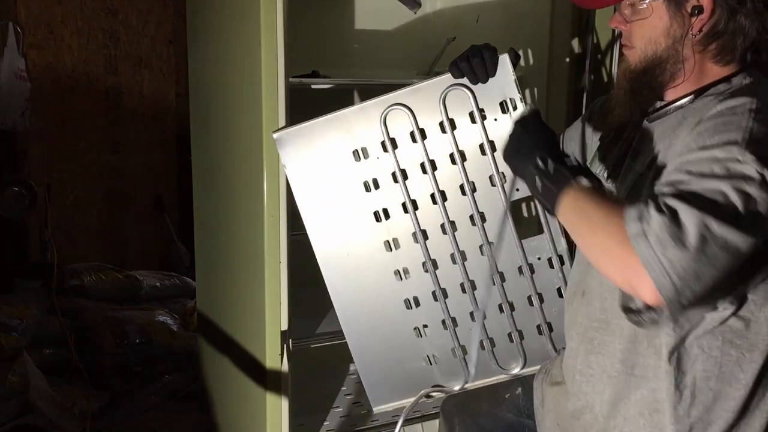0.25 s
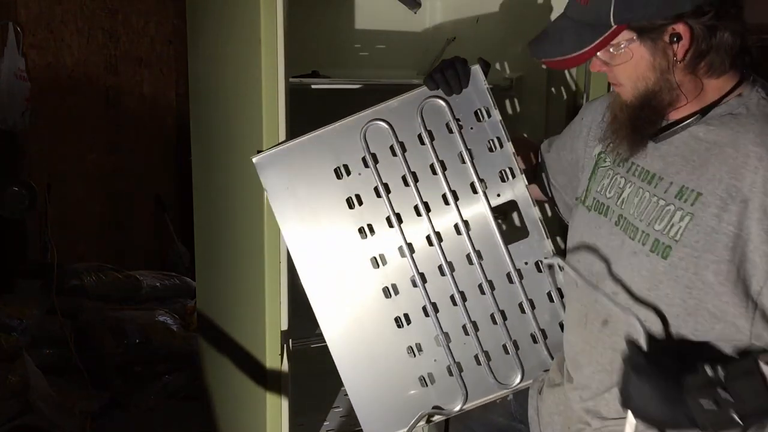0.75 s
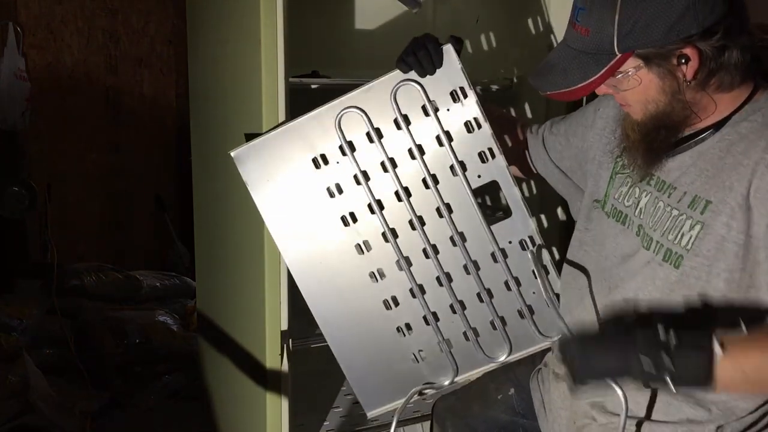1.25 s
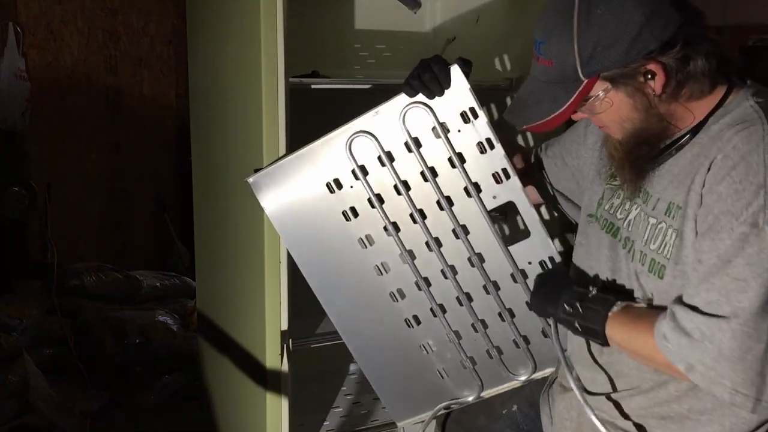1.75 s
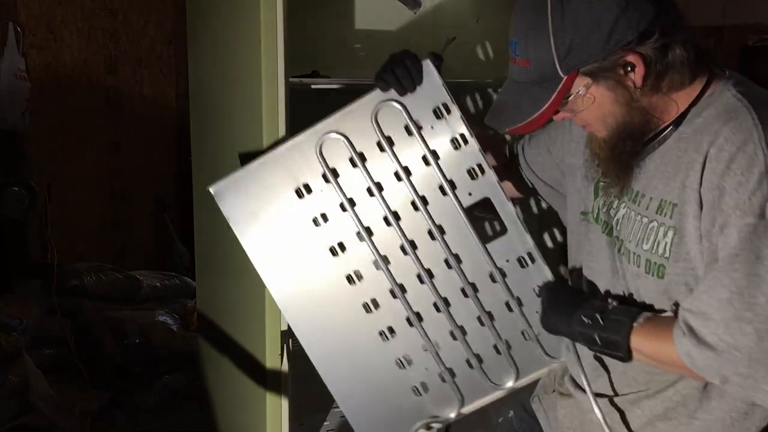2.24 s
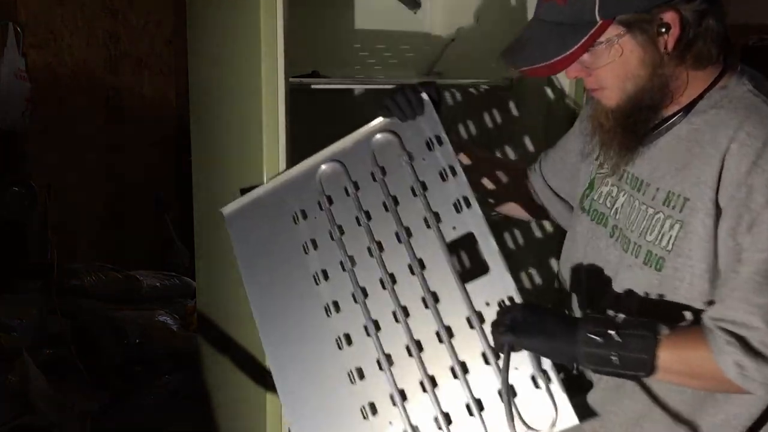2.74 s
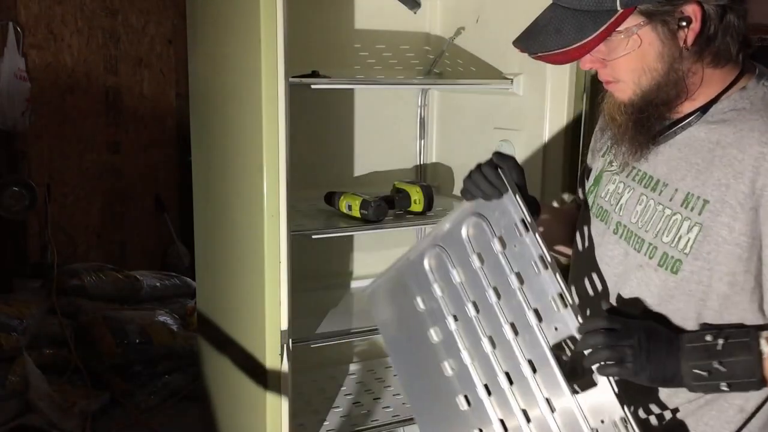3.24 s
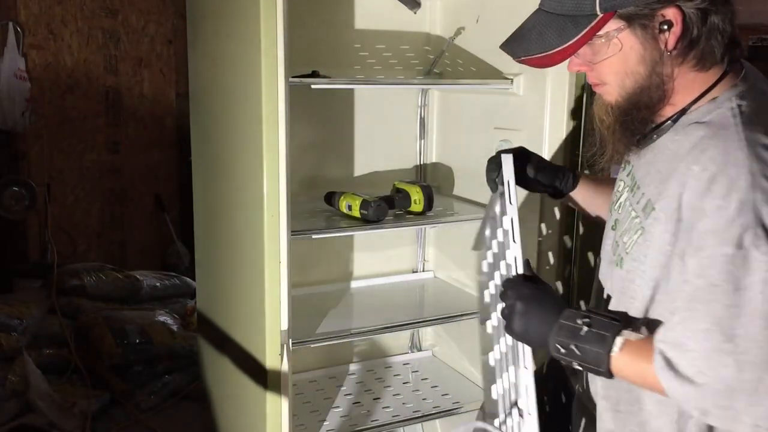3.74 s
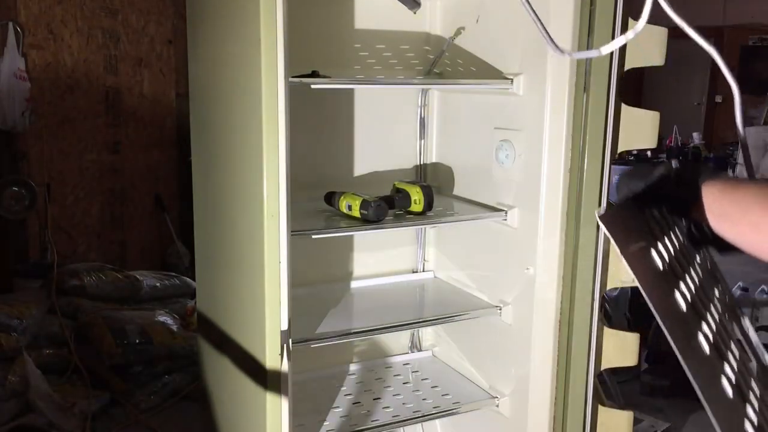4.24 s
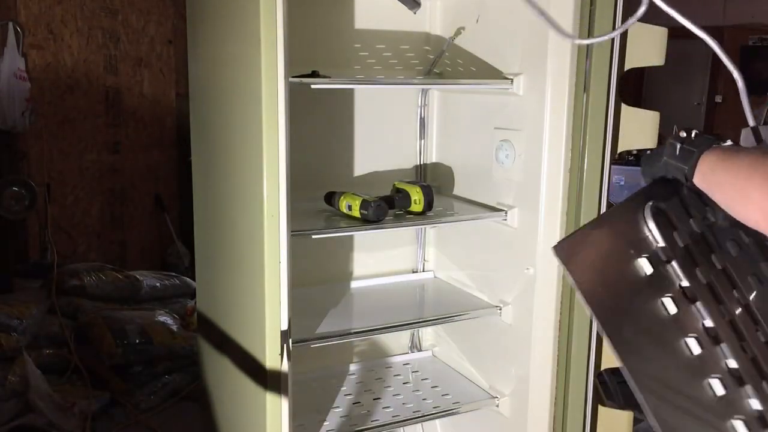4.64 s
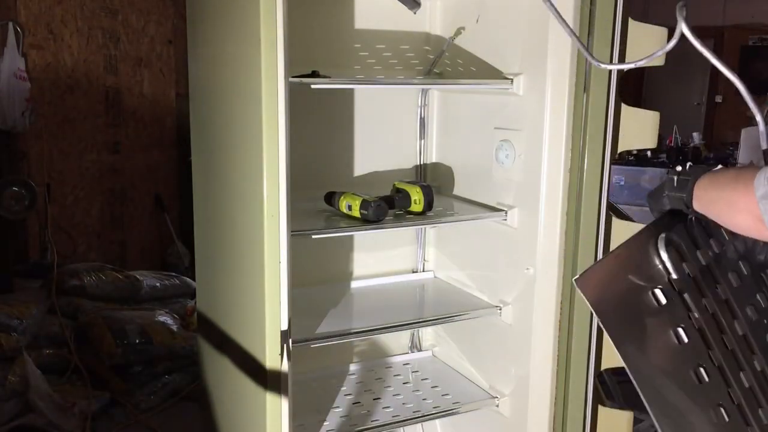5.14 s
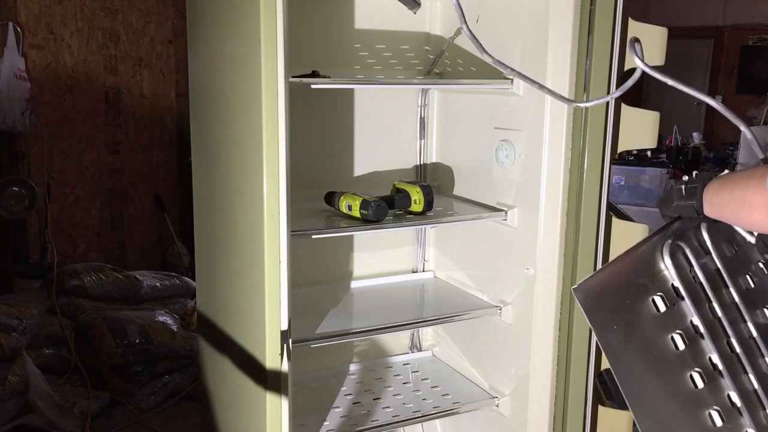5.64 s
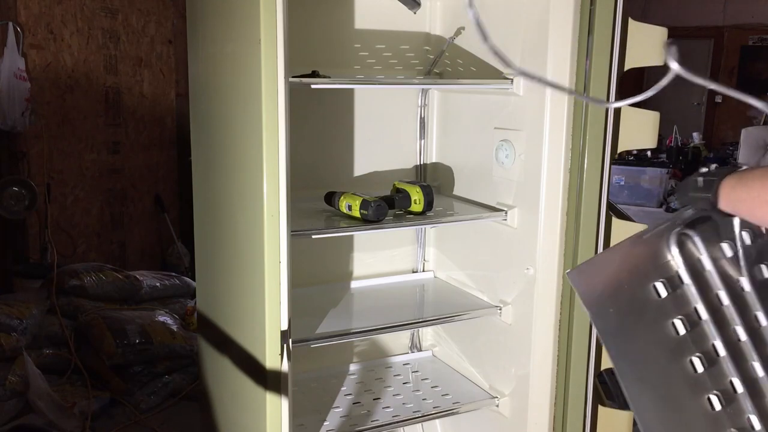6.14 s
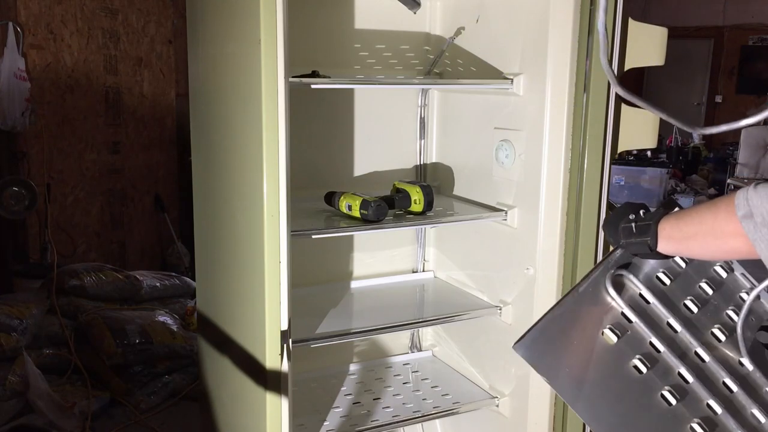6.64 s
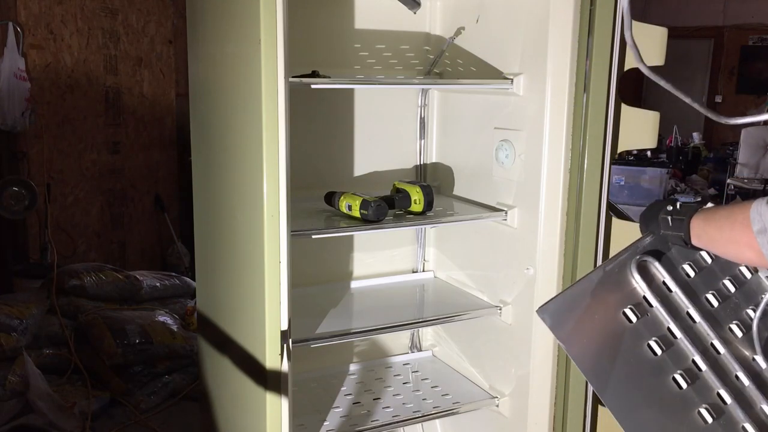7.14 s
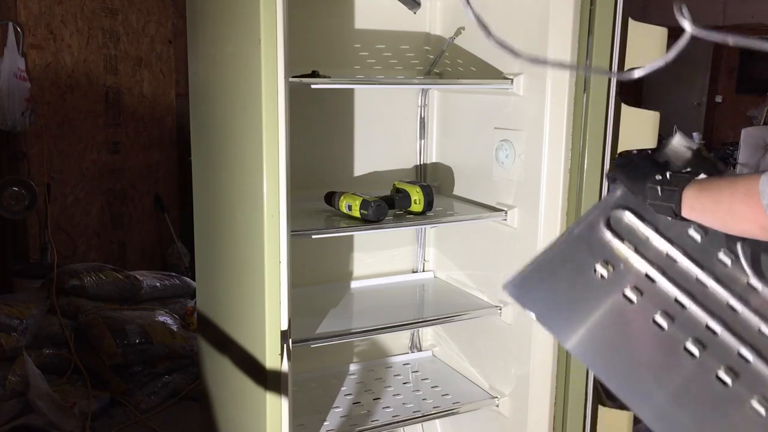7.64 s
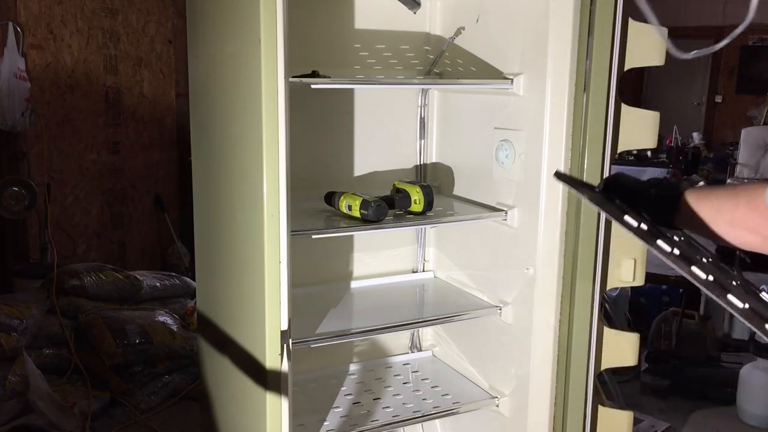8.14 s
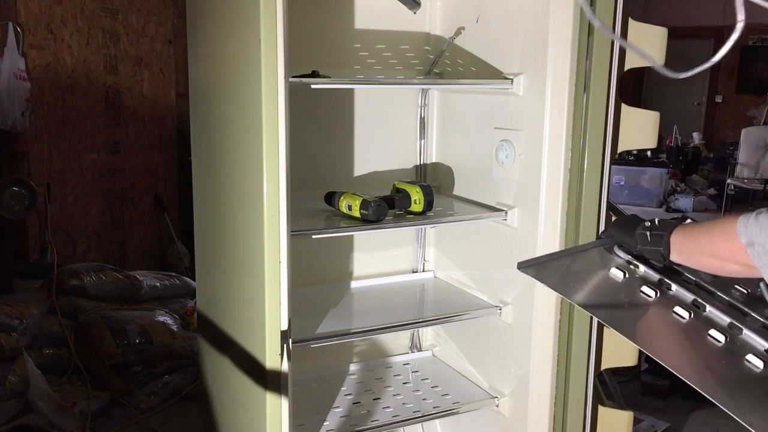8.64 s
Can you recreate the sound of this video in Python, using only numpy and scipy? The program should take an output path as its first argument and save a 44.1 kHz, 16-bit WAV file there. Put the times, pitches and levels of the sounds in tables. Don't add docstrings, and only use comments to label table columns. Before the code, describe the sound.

In a quiet workshop, gloved hands pull a thin metal tube from a perforated plate close to a small microphone. Clips snap in a quick cluster, then singly, ending in two loud, ringing releases. Gloves hiss and scrape afterwards, with a few creaks and looser clatters, over low room hum and a far-off wavering whir.

```python
import sys
import numpy as np
from scipy import signal
from scipy.fft import rfft, irfft
from scipy.io import wavfile

SR = 44100
rng = np.random.default_rng(int(sys.argv[2]) if len(sys.argv) > 2 else 0)


def dump(signal):
    limited = np.clip(np.atleast_2d(signal).T, -1, 1)
    pcm = np.round(limited * 32767).astype(np.int16)
    wavfile.write(sys.argv[1], SR, pcm)


def magnitude_from_level(level_db):
    exponent = np.asarray(level_db, float) / 20
    return 10 ** exponent


N = 391608

# pitch_hz, level_db per Hz
HUM_COLOUR = [(24, -48.5), (40, -14), (140, 6), (312, -3.5), (467, -2), (873, -14), (1040, -7),
              (2380, -14.5), (4930, -14.5), (12800, -19.5), (16000, -21.5)]
# time_s, level_db
WHIR_LEVEL = [(0.0, -71), (0.25, -81), (0.44, -53), (0.96, -68.5), (1.56, -89), (2.15, -65), (2.57, -86),
              (2.94, -80), (3.29, -86), (3.912, -82), (3.925, -66), (6.16, -64), (6.5, -60.5), (6.7, -64.5),
              (7.84, -66.5), (8.56, -70), (8.88, -77)]
# pitch_hz, level_db per Hz
WHIR_COLOUR = [(300, -39), (500, -7.5), (900, -3.5), (1450, -10), (1600, -12.5), (2500, -39.5)]
# time_s, pitch_hz
WHIR_PITCH = [(0, 994), (4.4, 1022), (5.0, 970), (5.4, 887), (5.9, 806), (6.15, 982), (7.5, 955),
              (8.88, 984)]

# pitch_hz, level_db per Hz
HISS_COLOUR = [(1060, -41.5), (1800, 10), (2060, 5), (2410, 5.5), (4700, 9.5), (14900, 4), (16000, -15)]
# pitch_hz, level_db per Hz
SCRAPE_COLOUR = [(200, -30), (400, -3.5), (700, -5), (1300, -5.5), (2200, -6), (3500, -16), (7000, -33)]
# start_s, hold_s, hiss_db, scrape_db
STROKES = [(0.014, .02, -71, -69), (0.115, 0.016, -68.5, -76), (1.223, 0.12, -62, -65),
           (1.247, 0.035, -72, -56.5), (1.404, 0.027, -62.5, -67.5), (1.504, 0.047, -64, -64.5),
           (1.666, .03, -67.5, -63.5), (1.836, 0.25, -68, -66.5), (2.19, 0.11, -70, -67),
           (2.324, 0.12, -63, -61), (2.509, 0.19, -68.5, -65), (3.479, 0.044, -67.5, -70.5),
           (3.553, 0.073, -88, -67), (3.633, 0.0088, -73, -76), (3.699, 0.021, -69.5, -76),
           (3.82, 0.031, -69, -82),
           (3.94, 0.025, -63.5, -67), (4.05, 0.026, -69, -75.5), (4.125, 0.013, -70, -71),
               (4.202, 0.015, -52, -58), (4.25, 0.055, -66.5, -65), (4.54, 0.15, -60.5, -68),
               (4.70, 0.098, -58, -70.5), (4.909, 0.065, -64.5, -65), (5.105, .02, -69, -69.5),
               (6.17, 0.077, -77, -75), (6.945, 0.01, -64, -72), (6.954, 0.066, -56, -62),
               (7.094, 0.029, -60, -63.5), (7.197, 0.012, -68, -74.5), (7.39, 0.026, -67.5, -84),
               (7.42, 0.027, -63.5, -76.5), (7.5, 0.032, -57, -71), (7.57, 0.078, -57, -59.5),
               (7.66, 0.061, -59, -55), (7.80, 0.063, -53, -65.5), (7.94, 0.067, -64.5, -65),
               (8.07, 0.048, -57.5, -74), (8.409, 0.01, -58, -70), (8.55, .01, -66, -69.5),
               (8.6, 0.011, -61.5, -73), (8.70, 0.095, -80, -63.5)]
# release_s, scrape_db, hum_db
CREAKS = [
    (0.264, -51.5, -67),
    (0.877, -52, -56.5),
    (1.25, -56, -59.5),
    (1.983, -56.5, -57),
    (2.33, -74, -71),
    (2.68, -66.5, -76),
    (5.355, -67, -67.5),
    (6.251, -66, -74.5),
    (6.617, -51.5, -68.5),
    (8.122, -58.5, -70),
]
# pitch_hz, width_hz, level_db
CREAK_TONES = [(537, 82, -5.5), (1080, 230, -13), (1690, 160, -9)]

# pitch_hz, t60_s
PLATE_T60 = [(150, 0.07), (600, 0.098), (2000, 0.14), (6000, 0.09), (15000, 0.045)]
# pitch_hz, t60_s
WASH_T60 = [(100, 0.53), (500, 0.44), (1300, .3), (2500, 0.53), (4000, 0.87), (6000, 0.85), (9000, 0.63),
            (15000, 1)]
# pitch_hz, level_db
WASH_COLOUR = [(60, -29), (150, -8), (500, 4), (1300, 1), (2500, -5.5), (4000, -8), (6000, -3.5),
               (9000, -5), (15000, -13)]
WASH_EDGES_HZ = 50 * 2 ** np.arange(0, 8.6, .5)

# start_s, level_db, thud_db, rattle_t60_s, wash_db
SNAPS = [(0.268, -25, -34, 0.076, -18.5), (0.3735, -25.5, -36, 0.051, -17), (0.396, -19.5, -44, 0.048, -45),
         (0.4094, -39, -47, 0.064, -28), (0.5445, -10.5, -36, 0.051, -44.5),
         (1.9884, -31.5, -37, 0.019, -12), (2.0085, -24.5, -57, 0.086, -37), (5.3575, -39, -35, 0.044, -43),
         (6.2584, -18.5, -25.5, 0.057, -26.5), (6.3252, -25, -25, 0.098, -27.5),
         (6.336, -21, -28.5, 0.03, -25), (6.623, -23.5, -26, 0.074, -29), (8.1353, -41.5, -70, 0.17, -29)]
# start_s, level_db, thud_db, rattle_t60_s, wash_db
CRACKS = [(.5006, -19, -32, 0.034, -40), (0.5028, -14.5, -23.5, 0.061, -18.5),
          (0.5356, -16.5, -30.5, 0.04, -38), (.8862, -30.5, -40, 0.044, -28),
          (1.698, -31, -41, 0.13, -20.5), (2.0435, -24.5, -34.5, 0.1, -24), (2.6842, -12, -27, 0.079, -23),
          (2.9684, -16, -33, 0.12, -18.5), (5.3628, -25.5, -31, 0.064, -22),
          (5.3915, -24.5, -54.5, 0.057, -39), (8.1275, -39, -40.5, 0.04, -16),
          (4.2085, -46, -59, 0.11, -28.5)]
# start_s, level_db, thud_db, rattle_t60_s, wash_db
SLIPS = [
    (0.8874, -18.5, -24.5, 0.081, -27),
    (8.8315, -27.5, -33.5, 0.1, -20),
]
# start_s, level_db, thud_db, edge_db
BUMPS = [(0.2915, -49, -42, -65), (.775, -61, -43, -78), (1.2464, -60, -43, -58),
         (2.336, -48, -46.5, -52.5), (3.6415, -53, -54.5, -48.5), (4.135, -49, -60.5, -50.5),
         (5.116, -46, -63.5, -57.5), (5.708, -68.5, -72, -80), (6.5125, -54, -60, -69),
         (7.528, -45, -63.5, -68.5), (8.42, -63, -73, -48.5), (8.7261, -63, -57, -65.5),
         (8.7645, -69, -66, -74)]
# start_s, level_db, thud_db, edge_db
TICKS = [(3.919, -55, -68, -61), (4.4972, -52, -66.5, -55), (4.5622, -53.5, -54, -56),
         (6.957, -49, -66, -58), (7.0186, -55, -64, -49), (7.084, -48, -49.5, -54), (7.6719, -47, -63, -57),
         (7.502, -51.5, -69, -52), (8.5567, -56, -72, -51), (8.602, -50, -58, -50),
         (8.6985, -63, -67.5, -62.5)]
# start_s, level_db
FIRST_BLOWS = [(.2677, -34), (.3734, -38), (.3948, -35), (.5047, -23), (.5116, -24), (.5373, -23),
               (.5408, -23), (.5431, -22), (.8864, -32), (.8883, -32), (.891, -33), (1.7002, -38),
               (1.7046, -38), (2.0128, -35), (2.0473, -30), (2.6836, -14), (2.6866, -15), (2.6883, -16),
               (2.6923, -15), (2.9682, -12.5), (2.9703, -17), (4.2075, -47), (4.4968, -57), (4.562, -49),
               (5.363, -32), (5.3685, -31), (5.391, -29), (5.3928, -31), (6.258, -32), (6.2603, -32),
               (6.3235, -32), (6.331, -33), (6.337, -27), (6.6256, -33), (6.9587, -53), (6.9625, -56),
               (7.0186, -51), (7.024, -54), (7.5015, -51), (7.5279, -52), (7.627, -55), (7.6716, -54),
               (7.8043, -55), (8.1349, -47), (8.4189, -56), (8.5556, -55), (8.6025, -50), (8.8407, -40)]
# pitch_hz, level_db
SNAP_COLOUR = [(40, -59.5), (100, -25.5), (190, -5.5), (500, 0), (1200, -6.5), (3000, -6.5), (6000, 8.5),
               (10000, 2), (16000, -9)]

# pitch_hz, level_db, t60_s
PLATE_UP = [(186.3, -13, 0.27), (555.8, 0.5, 0.12), (544, -10, 0.27), (635, -9.5, 0.23), (1053, -3, 0.057),
            (1116, -17.5, .25)]
# pitch_hz, level_db, t60_s
TAB = [(1772, -4.5, 0.086), (1631, -6.5, 0.13), (2110, -13.5, 0.13)]
TUBE_HZ = 5530
# pitch_hz, level_db, t60_s
TUBE = [(TUBE_HZ, -1.5, 0.056), (TUBE_HZ, -24.5, 0.51)]
# pitch_hz, level_db, t60_s
PLATE_LOW = [(203, -4, 0.32), (343.7, -9, 0.23), (445, -8, 0.17), (555.6, 2, 0.098), (607, -8, 0.22),
             (700, 0.5, 0.065), (866, 0.5, 0.07), (1051, 0, 0.069), (1229, -6, 0.14), (1554, -4, 0.12),
             (1916, -5.5, 0.099)]
# pitch_hz, level_db, t60_s
CORNER = [(230, -17, 0.33), (511, -3, 0.14), (619, -11.5, 0.4), (764, -16.5, 0.3), (1529, -7, 0.13),
          (2230, -9, 0.35), (2051, -13, .42), (1728, -16.5, 0.4), (2390, -6, 0.2), (2729, -12.5, .2),
          (4400, -5.5, 0.06), (4910, -18, 0.44), (5152, -18.5, 0.37), (6590, -13, .17)]
# pitch_hz, level_db, t60_s
EDGE = [(200, -19.5, 0.66), (449.5, -14.5, 0.2), (656, -9.5, 0.35), (787, -4.5, 0.3), (1087, -14.5, 0.18),
        (1250, -12.5, 0.3), (1433, -14.5, 0.33), (1650, -4.5, 0.36), (1740, -6.5, 0.25), (1910, -13.5, 0.3),
        (2256, -19, .3), (3688, -15, .5), (4102, -20, 0.6), (4777, -17, .4)]
# start_s, level_db
CORNER_BLOW = (2.684, -26.5)
# start_s, level_db
EDGE_BLOW = (2.969, -28)
# start_s, plate_db, tuning_ratio, tab_db
RINGING_UP = [(.267, -32.5, 1.026, -25), (0.288, -33.5, 1.08, -58), (.372, -34, 1.01, -28.5),
              (.394, -34.5, 0.96, -50), (.425, -42, .98, -68), (.503, -30, 1.06, -23),
              (.519, -29.5, 1.05, -49.5), (0.538, -29, 1.02, -35), (.888, -30.5, 1.09, -31.5),
              (1.245, -49, 1.01, -73), (1.523, -76, 1.005, -59), (1.701, -42, 1.08, -41),
              (1.99, -36, 1, -50), (2.008, -34.5, 1, -28.5), (2.043, -38.5, 0.99, -55)]
# start_s, level_db, favoured_hz
RINGING_LOW = [(4.562, -50, 670), (5.362, -32, 700), (5.39, -38, 388), (6.257, -31, 1080),
               (6.327, -28, 1010), (6.336, -40, 496), (6.512, -52.5, 700), (6.624, -37.5, 580),
               (7.085, -51.5, 1006), (7.089, -54.5, 220), (7.672, -48.5, 510), (8.1272, -36, 770),
               (8.831, -40.5, 1300)]
# start_s, level_db
TUBE_BLOWS = [
    (0.502, -19),
    (.889, -30.5),
    (2.051, -50),
    (3.642, -65),
    (5.366, -34),
    (8.417, -56.5),
]
# start_s, level_db, pitch_hz, t60_s
LONE_MODES = [(.538, -54, 286, 0.45), (.54, -49.5, 1606, 0.57), (1.31, -61, 5030, 0.26),
              (1.33, -64, 402, 0.42), (1.701, -71, 260, 0.7), (2.061, -53, 1266, 0.57),
              (2.34, -60, 4800, 0.078), (3.49, -61, 3940, 0.058), (4.24, -67, 292, 0.76),
              (6.335, -31, 5200, 0.047)]
# start_s, level_db, pitch_hz, t60_s
LONE_NOTES = [(.878, -29.5, 1632, 0.065), (0.886, -28.5, 2800, 0.055), (1.138, -62, 2850, 0.047),
              (1.99, -35, 1065, 0.079), (2.772, -45, 635, 0.1), (2.776, -52, 1254, 0.093),
              (6.257, -37, 1475, 0.13), (6.258, -36, 2454, 0.092), (6.258, -33.5, 2124, 0.11),
              (6.257, -41, 4110, 0.052), (6.323, -39, 5580, .05), (6.336, -38, 3590, 0.11),
              (6.336, -41, 2210, 0.12), (6.337, -39, 457, 0.27), (6.985, -60, 4510, 0.076),
              (8.11, -54.5, 2000, 0.053), (8.70, -64.5, 2000, 0.055), (8.727, -58, 2050, 0.042),
              (8.76, -57, 2050, .04), (8.833, -41, 1907, 0.086), (8.835, -39, 4780, 0.066),
              (8.835, -43, 5800, .06), (1.155, -63, 3200, .04), (2.685, -42, 347, 0.26),
              (2.97, -54, 330, .25), (5.365, -35, 4750, .05), (5.392, -60, 4700, .5),
              (6.328, -37, 388.6, 0.18), (1.255, -53, 1710, 0.11),
              (2.6834, -5.5, 4400, 0.0087), (2.688, -19, 14000, .012), (2.683, -21, 8600, 0.037),
         (2.69, -22, 2070, .08), (2.9676, -6, 3980, 0.0076), (2.9682, -20, 6920, .05),
         (2.9682, -21, 8760, 0.048), (2.9682, -23.5, 4900, .06), (2.9682, -22.5, 3740, 0.073),
         (2.9682, -26, 5900, .08), (2.985, -39, 5195, 0.19), (2.99, -47, 5880, 0.44), (2.99, -49, 3230, .3),
         (4.21, -50, 5220, .07), (4.212, -54, 3700, 0.081), (4.21, -55, 2000, .1), (4.225, -56, 1140, .06),
         (4.4968, -51.5, 2600, .015), (4.562, -47, 1300, 0.018), (4.57, -57, 2000, .08),
         (7.505, -60, 5300, .08), (7.528, -56, 5200, 0.076), (7.672, -53, 2410, .06),
         (8.11, -59.5, 2600, .05), (8.135, -56, 4000, .05), (8.142, -56, 5600, .04),
         (0.265, -29, 1700, 0.075), (.285, -35, 1000, .1), (.545, -30, 1588, 0.073),
         (.54, -25, 2150, 0.052),
              (.29, -37.5, 603, 0.26), (.396, -37.5, 549.5, .3), (.425, -44, 541, .25),
               (.54, -46, 3365, .26), (.54, -54, 7343, .35), (.54, -54, 6272, .39),
               (1.232, -49.5, 559, .12), (1.262, -52, 1045, 0.13), (1.335, -64, 5030, 0.14),
               (2.24, -61, 561, 0.29), (2.285, -55, 572, .15), (2.336, -58, 565, .1),
               (2.34, -60, 960, 0.22), (2.338, -57.5, 1860, .1), (2.405, -63, 2190, .12),
               (5.37, -57, 5615, 0.76), (.56, -55, 5523, 1.0), (6.34, -57, 6100, 0.36),
               (.892, -54.5, 5560, 0.68), (6.34, -46, 614, 0.41), (6.959, -52, 4200, .03),
               (6.96, -55.5, 2600, 0.039), (7.0195, -50, 4600, .03), (7.0845, -48, 1500, .07),
               (8.8225, -41, 1000, 0.041), (8.8225, -47, 2700, .03), (8.84, -37, 1960, .05),
               (8.727, -57, 1000, .05), (8.76, -59.5, 1100, .05)]


def rms_one(x):
    return x / np.sqrt(np.mean(x ** 2) + 1e-20)


def at_hz(points, hz):
    table_hz, values = np.array(points).T
    return np.interp(np.log(hz), np.log(table_hz), values)


def in_time(rows):
    s, values = np.transpose(rows)
    return np.interp(np.arange(N) / SR, s, values)


def band_filter(x, order, hz, kind):
    return signal.sosfilt(signal.butter(order, hz, kind, fs=SR, output="sos"), x)


def coloured(x, points):
    hz = np.maximum(np.fft.rfftfreq(len(x), 1 / SR), 1)
    return irfft(rfft(x) * magnitude_from_level(at_hz(points, hz)), len(x))


def causal(x, points):
    hz = np.maximum(np.fft.rfftfreq(4096, 1 / SR), 1)
    cepstrum = irfft(np.log(magnitude_from_level(at_hz(points, hz))))
    cepstrum[1:2048] *= 2
    cepstrum[2049:] = 0
    return signal.fftconvolve(x, irfft(np.exp(rfft(cepstrum))))[:len(x)]


def flicker(rate_hz):
    knots = rng.standard_normal(int(N / SR * 200) + 2)
    return np.interp(np.arange(N) / SR * np.clip(rate_hz, .1, 190), np.arange(len(knots)), knots)


def gritty(spread_db):
    noise = rng.standard_normal(N)
    size_db = spread_db * np.minimum(rng.exponential(1, N), 5)
    return rms_one(noise * magnitude_from_level(size_db))


def whistle(hz, width_hz):
    a, b = band_filter(rng.standard_normal((2, N)), 2, width_hz, "low")
    turn = 2 * np.pi * np.cumsum(hz) / SR
    return rms_one(a * np.cos(turn) + b * np.sin(turn))


def room_hum():
    return magnitude_from_level(-66.5 - 3.0) * rms_one(coloured(rng.standard_normal(N), HUM_COLOUR))


def distant_whir():
    gliding = magnitude_from_level(-4) * whistle(in_time(WHIR_PITCH), width_hz=45)
    level = magnitude_from_level(-6) * whistle(np.full(N, 1390.), width_hz=130)
    breath = rms_one(coloured(rng.standard_normal(N), WHIR_COLOUR))
    return (breath + gliding + level) * magnitude_from_level(in_time(WHIR_LEVEL) - 7.5 + 1.4 * flicker(7.5))


def plate_response():
    t = np.arange(SR // 2) / SR
    mode_hz = 140 + 15800 * rng.random(500) ** 1.6
    size = rng.standard_normal(500)
    decay = np.log(1000) / at_hz(PLATE_T60, mode_hz)
    response = np.zeros(len(t))
    for hz, a, d in zip(mode_hz, size, decay):
        response += a * np.sqrt(d) * np.exp(-d * t) * np.sin(2 * np.pi * hz * t)
    return response / np.sqrt(np.sum(response ** 2))


def hands():
    rise_db_per_s, fall_db_per_s, attack_s = 602, 206, 0.02
    creak_rise_db_per_s, creak_hiss_db = 203, -7
    t = np.arange(N) / SR
    grip_db = np.array([[-82], [-76]])
    power = np.ones((2, N)) * magnitude_from_level(grip_db) ** 2
    for s, hold, *levels_db in STROKES:
        top = s + attack_s / 2
        loss = np.maximum(rise_db_per_s * (top - t), 0) + np.maximum(fall_db_per_s * (t - s - hold), 0)
        power += magnitude_from_level(np.array(levels_db)[:, None] - np.minimum(loss, 60)) ** 2 * (loss < 60)
    for s, db, _ in CREAKS:
        loss = np.where(t < s, creak_rise_db_per_s * (s - t), 60)
        levels_db = np.array([[db + creak_hiss_db], [db]])
        power += magnitude_from_level(levels_db - np.minimum(loss, 60)) ** 2 * (loss < 60)
    return np.sqrt(power)


def rubbing(plate, plate_db):
    hiss_gain, scrape_gain = hands()
    slip = flicker(45)
    hiss = rms_one(coloured(gritty(spread_db=3.0), HISS_COLOUR)) * hiss_gain
    hiss = hiss * magnitude_from_level(0.96 * slip + 1.8 * flicker(150))
    scrape = rms_one(coloured(gritty(spread_db=2.5), SCRAPE_COLOUR)) * scrape_gain
    scrape = scrape * magnitude_from_level(-0.5 + 1.0 * slip + 2.6 * flicker(25))
    rub = hiss + scrape
    return magnitude_from_level(-2.0) * rub + magnitude_from_level(plate_db) * signal.fftconvolve(rub, plate)[:N]


def creak_tones():
    rise_db_per_s = 88.5
    t, gain = np.arange(N) / SR, np.zeros(N)
    for s, _, tone_db in CREAKS:
        pulling = (t < s) * (t > s - .3)
        gain += magnitude_from_level(tone_db - np.clip(rise_db_per_s * (s - t), 0, 40)) * pulling
    return gain * sum(magnitude_from_level(db) * whistle(np.full(N, hz + 0.), width_hz / 2) for hz, width_hz, db in CREAK_TONES)


def firm(table, edge_db, air_db):
    rows = []
    for s, db, thud_db, t60, wash_db in table:
        rows.append((s, db, thud_db, db + edge_db, db + edge_db + air_db, t60, wash_db))
    return rows


def touches(table, t60):
    air_db, wash_db = 2.5, -22.5
    return [(*row, row[-1] + air_db, t60, wash_db) for row in table]


def blows():
    soft = firm(SNAPS, edge_db=-9, air_db=1) + touches(BUMPS, t60=0.059)
    sharp = firm(CRACKS, edge_db=-3.5, air_db=1.25) + touches(TICKS, t60=0.058)
    dragged = firm(SLIPS, edge_db=-9, air_db=3)
    return (soft, 5.0, 4.0), (sharp, .4, .6), (dragged, 14.0, 9.0)


def wash():
    rows = np.concatenate([table for table, *_ in blows()])
    stripe_hz = np.arange(50, SR / 2, 70)
    white = []
    for noise in rng.standard_normal((2, N)):
        stripes_db = 2.2 * rng.standard_normal(len(stripe_hz))
        white.append(coloured(noise, np.c_[stripe_hz, stripes_db]))
    fill = np.exp(-1 / (0.0016 * SR))
    out = np.zeros(N)
    for k, (low, high) in enumerate(zip(WASH_EDGES_HZ, WASH_EDGES_HZ[1:])):
        hz = np.sqrt(low * high)
        blow_db = []
        for s, mid_db, low_db, high_db, top_db, t60, wash_db in rows:
            spectrum = [(450, low_db), (1800, mid_db), (6000, high_db), (12000, top_db)]
            blow_db.append(at_hz(spectrum, hz) + wash_db)
        energy = np.full(N, 1e-18)
        energy[(rows[:, 0] * SR).astype(int)] = magnitude_from_level(np.array(blow_db) + at_hz(WASH_COLOUR, hz)) ** 2
        keep = magnitude_from_level(-120 / (at_hz(WASH_T60, hz) * SR))
        energy = signal.lfilter([1 - fill], np.convolve([1, -keep], [1, -fill]), energy)
        out += np.sqrt(energy) * rms_one(band_filter(white[k % 2], 2, [low, high], "band"))
    return band_filter(out, 6, 14800, "low")


def struck_modes():
    favour_db_per_octave = 8
    out = list(LONE_MODES)
    for s, plate_db, tuning, tab_db in RINGING_UP:
        out += [(s, plate_db + db, hz * tuning, t60) for hz, db, t60 in PLATE_UP]
        out += [(s, tab_db + db, hz, t60) for hz, db, t60 in TAB]
    for s, level_db, near_hz in RINGING_LOW:
        for hz, db, t60 in PLATE_LOW:
            loss_db = favour_db_per_octave * abs(np.log2(hz / near_hz))
            out.append((s, level_db + db - loss_db, hz, t60))
    for modes, hits in ((TUBE, TUBE_BLOWS), (CORNER, [CORNER_BLOW]), (EDGE, [EDGE_BLOW])):
        out += [(s, level_db + db, hz, t60) for s, level_db in hits for hz, db, t60 in modes]
    return out + LONE_NOTES


def rings(rough):
    out, t = np.zeros(N), np.arange(SR // 2) / SR
    knots = rng.standard_normal((440, 2, 90))
    for (s, level_db, hz, t60), pair in zip(struck_modes(), knots):
        step = t * (35.0 + 0.0055 * hz + 14.0 / max(t60, .01))
        a, b = [np.interp(step, np.arange(90), k) for k in pair]
        stands_alone = hz < 900 or t60 > .25
        waver = rough * (.55 if stands_alone else 1)
        turn = 2 * np.pi * hz * t
        tone = (1 + waver * a) * np.sin(turn) + waver * b * np.cos(turn)
        t60 = max(t60, .004)
        onset = 1 - np.exp(-t / min(0.0019, t60 / 40))
        at = int(s * SR)
        out[at:at + len(t)] += (tone * onset * magnitude_from_level(level_db - 60 * t / t60))[:N - at]
    return out


def rattle(t60, rise_ms):
    t = np.arange(int(t60 * 1.3 * SR)) / SR
    return (1 - np.exp(-t * 1000 / rise_ms)) * magnitude_from_level(-60 * t / t60)


def snaps(plate, plate_db, direct_db):
    drive, contacts = np.zeros((4, N + SR)), gritty(spread_db=2.5)
    for table, rise_ms, lead_ms in blows():
        for s, *levels_db, t60, _ in table:
            at = int((s - lead_ms / 1000) * SR)
            shape = rattle(max(t60, .01), rise_ms)
            drive[:, at:at + len(shape)] += magnitude_from_level(np.array(levels_db))[:, None] * shape
    # cut_hz, kind, level_db that evens the bands
    bands = [([900, 3500], "band", 8), (900, "low", 10), ([3500, 8500], "band", 0), (8500, "high", 0)]
    x = np.zeros(N)
    for (hz, kind, even_db), gain in zip(bands, drive):
        x += magnitude_from_level(even_db) * band_filter(contacts * gain[:N], 2, hz, kind)
    for s, level_db in FIRST_BLOWS:
        at = int(s * SR)
        x[at:at + 4] += magnitude_from_level(level_db) * np.array([1, 1, -1, -1])
    x = causal(x, SNAP_COLOUR)
    return magnitude_from_level(direct_db) * x + magnitude_from_level(plate_db) * signal.fftconvolve(x, plate)[:N]


def scene():
    plate = plate_response()
    metal = snaps(plate, plate_db=-6.0, direct_db=1.04) + rings(rough=0.89) + wash() + creak_tones()
    gloves = rubbing(plate, plate_db=-12.5)
    background = room_hum() + distant_whir()
    return (metal + gloves + background)[None]


def low_pass(x):
    return signal.sosfilt(signal.butter(12, 16600, fs=SR, output="sos"), x)


def record(dry):
    mix = band_filter(dry, 2, 75, "high")
    mix = signal.sosfilt(signal.cheby2(10, 40, 16500, fs=SR, output="sos"), mix)
    return low_pass(mix)


dry = scene()
out = record(dry)
dump(out)
```